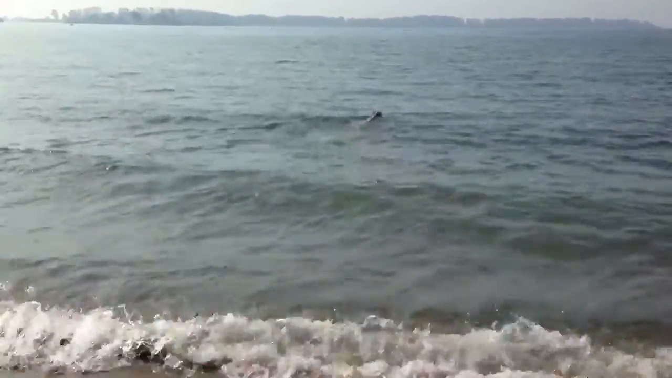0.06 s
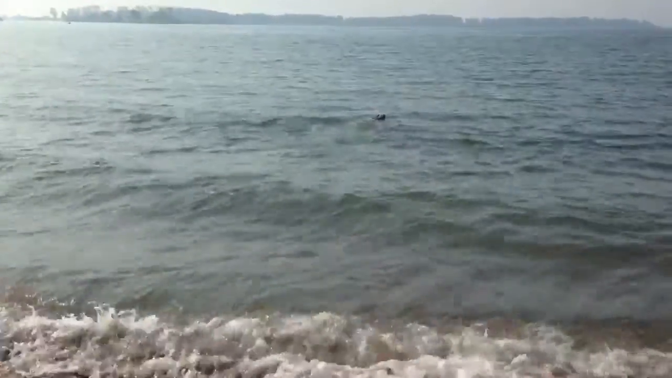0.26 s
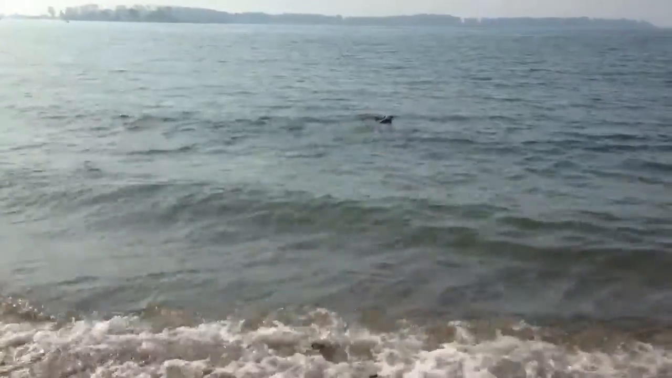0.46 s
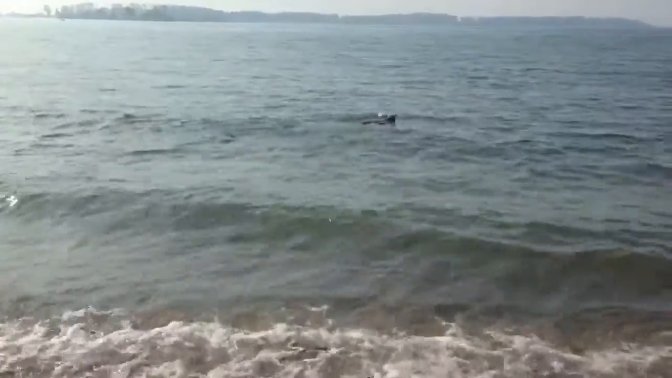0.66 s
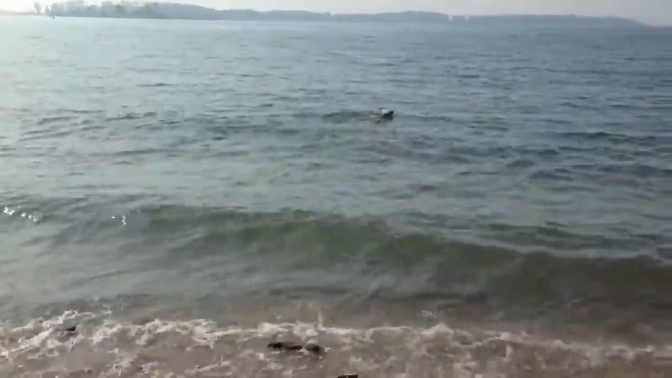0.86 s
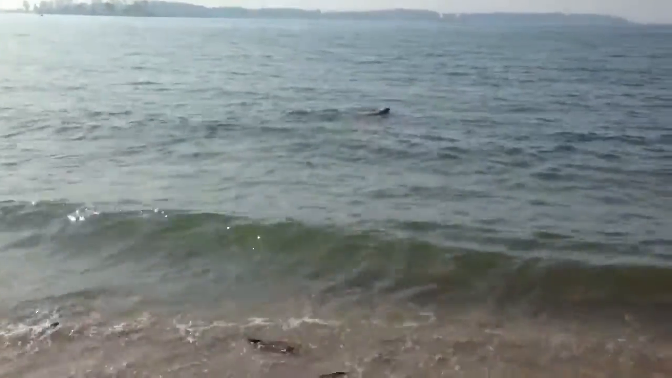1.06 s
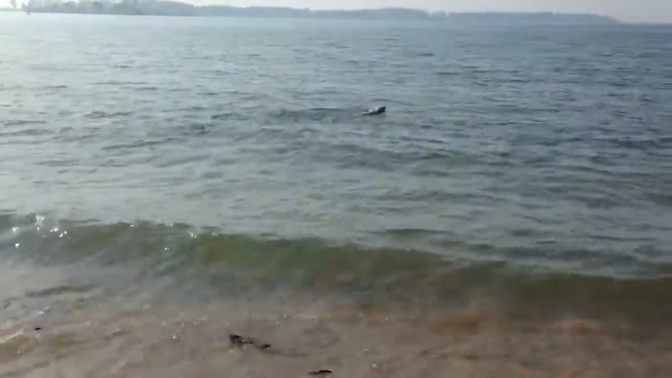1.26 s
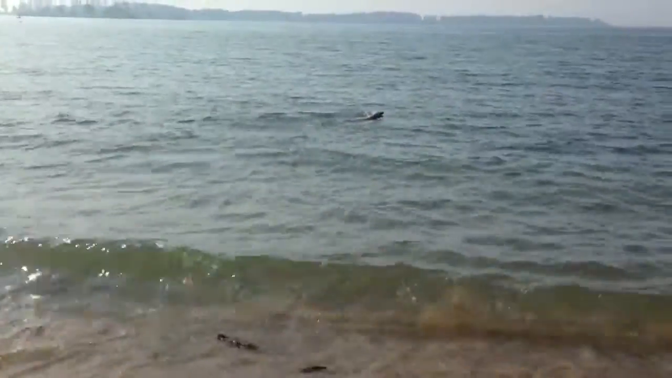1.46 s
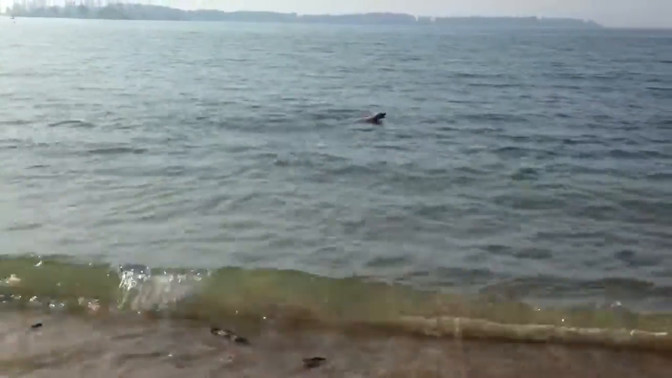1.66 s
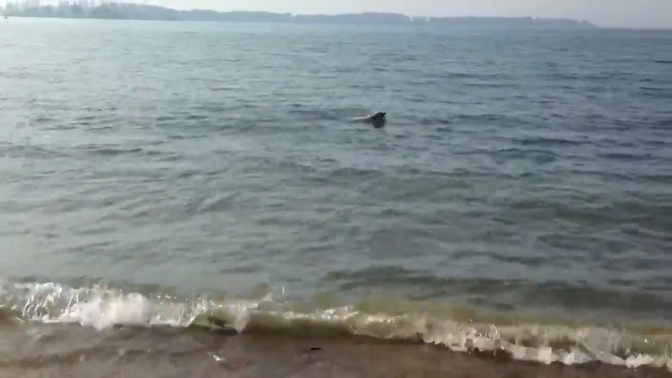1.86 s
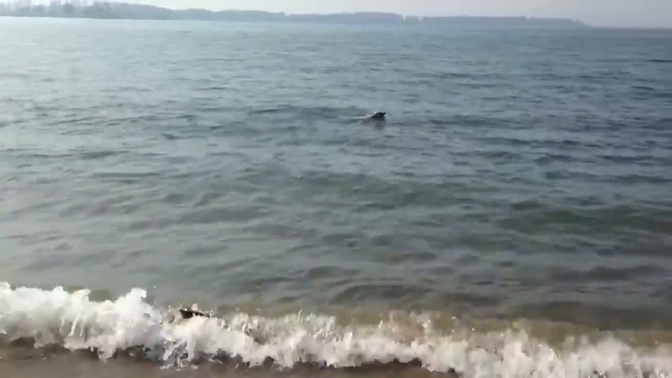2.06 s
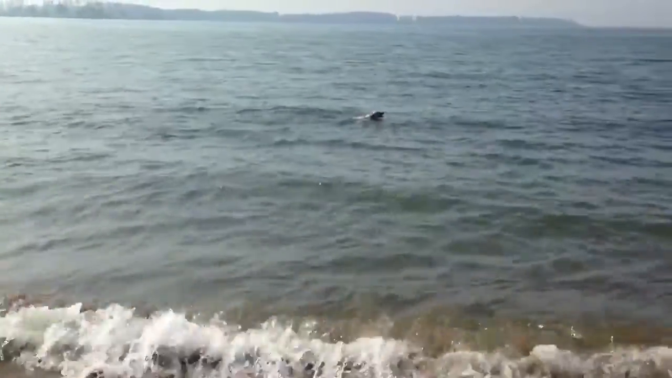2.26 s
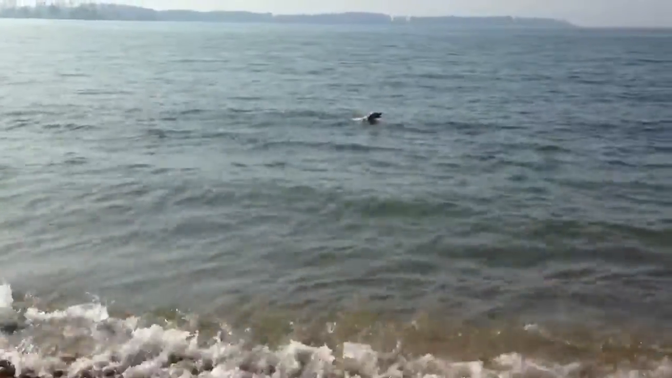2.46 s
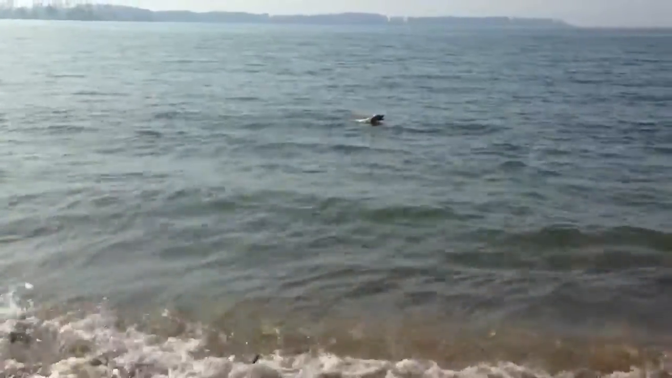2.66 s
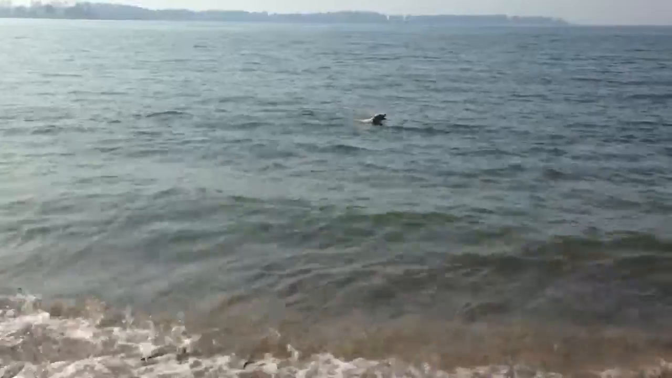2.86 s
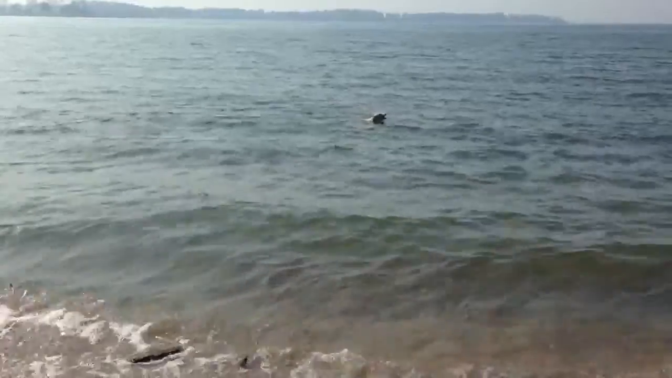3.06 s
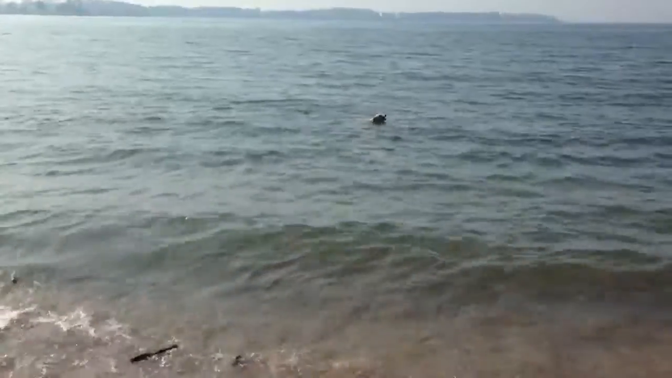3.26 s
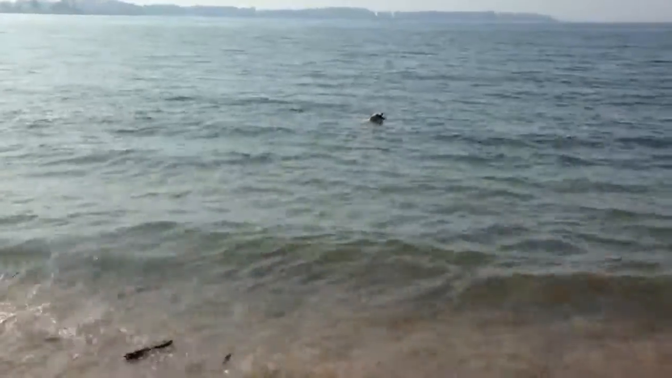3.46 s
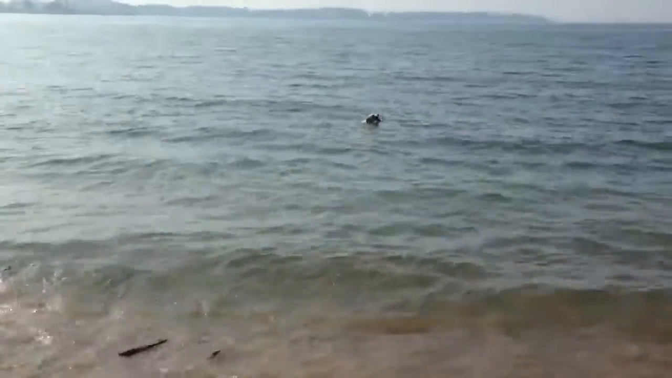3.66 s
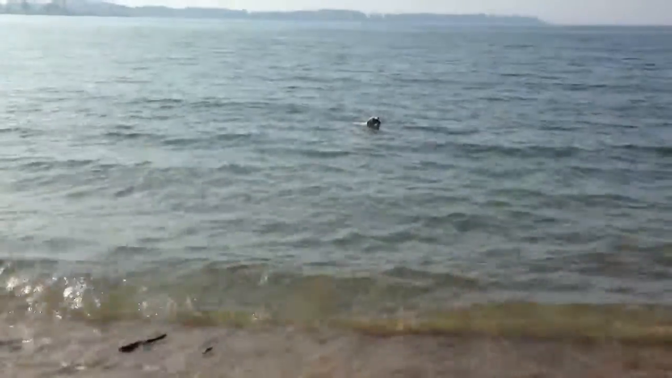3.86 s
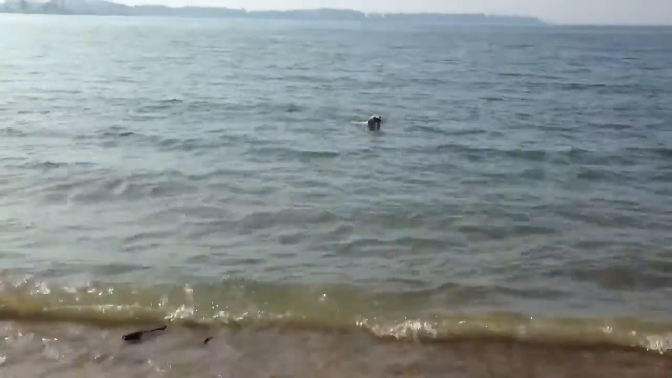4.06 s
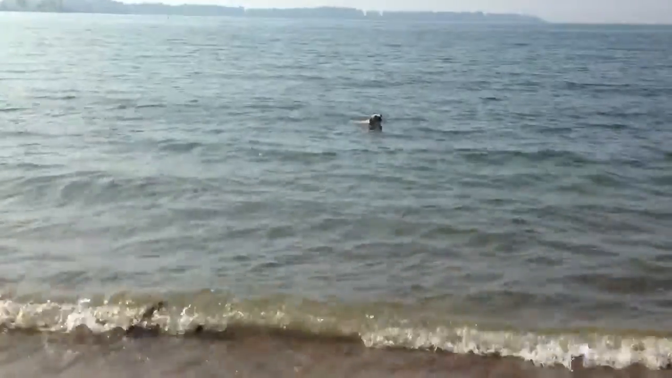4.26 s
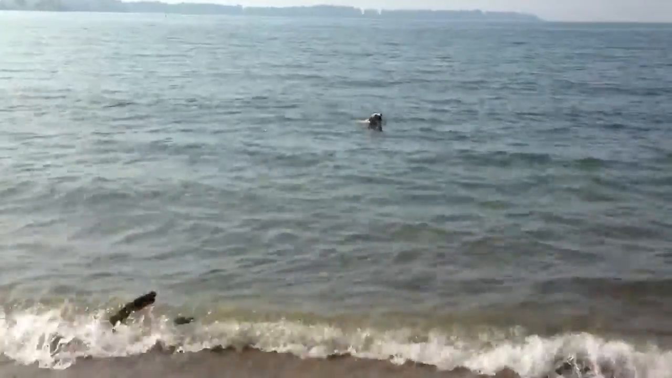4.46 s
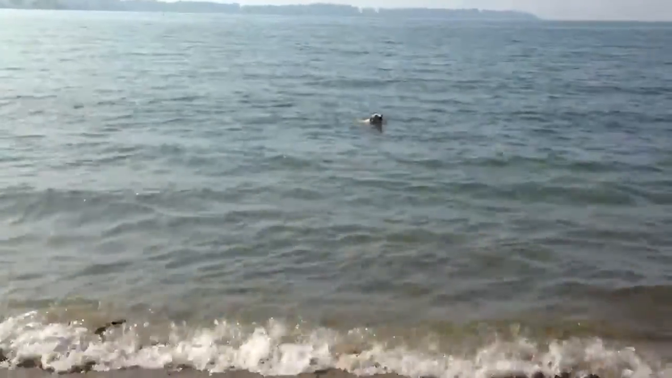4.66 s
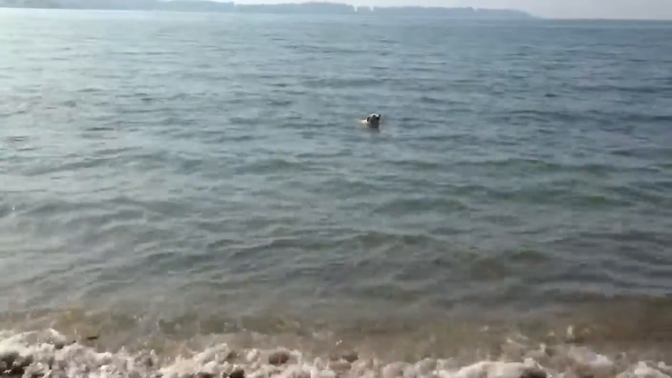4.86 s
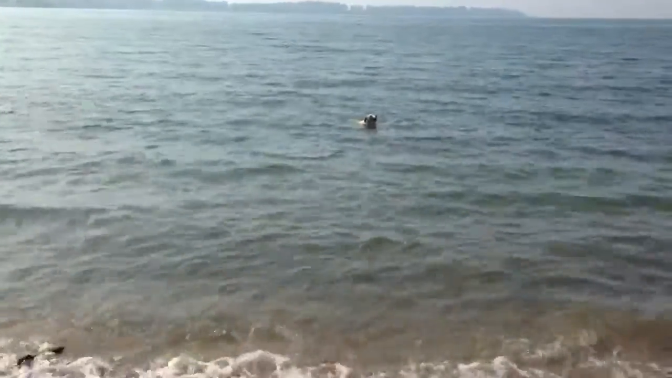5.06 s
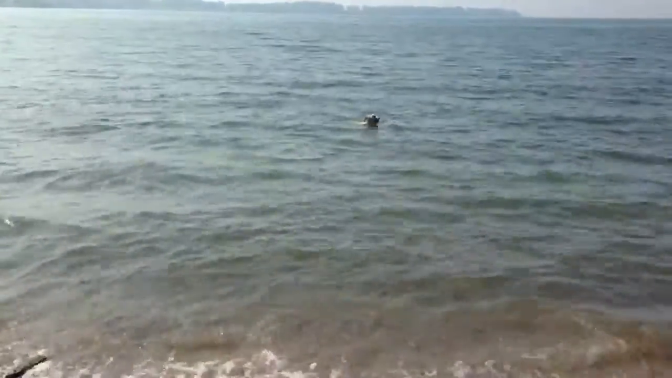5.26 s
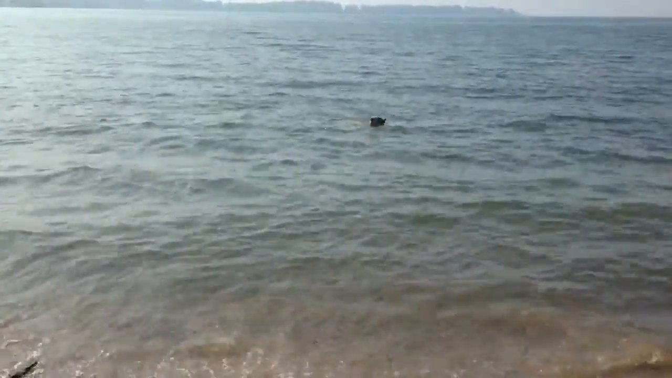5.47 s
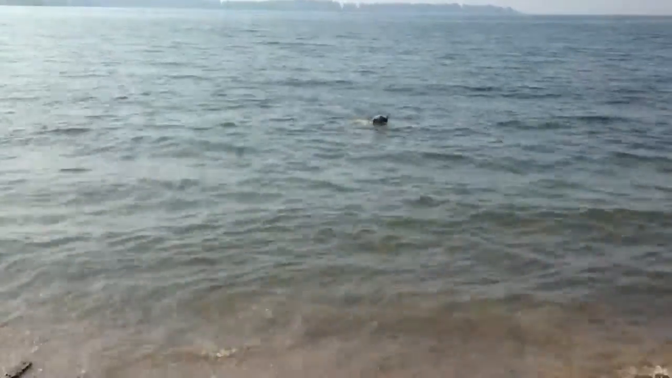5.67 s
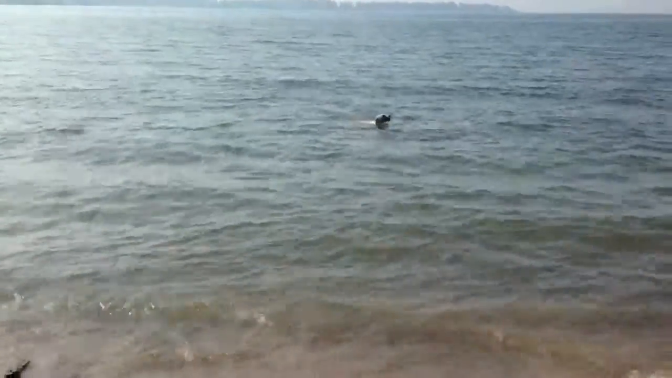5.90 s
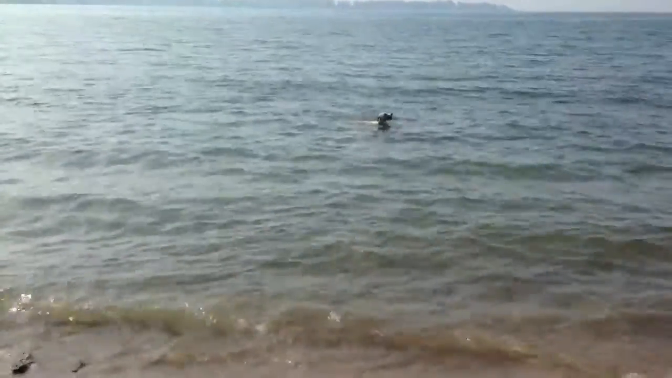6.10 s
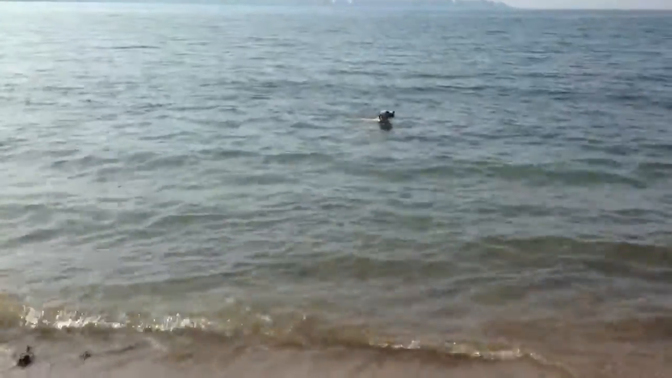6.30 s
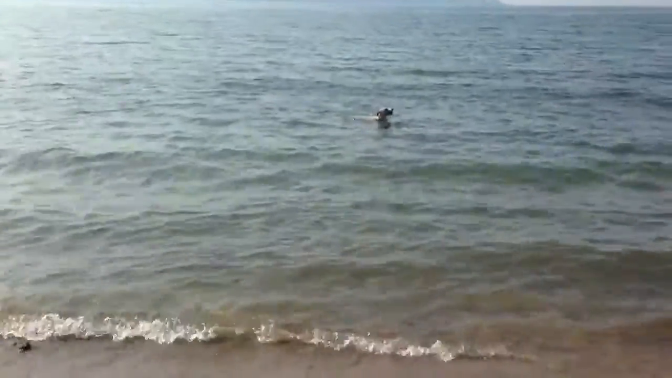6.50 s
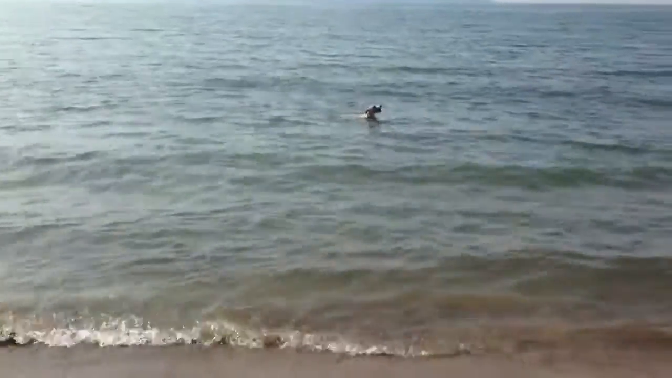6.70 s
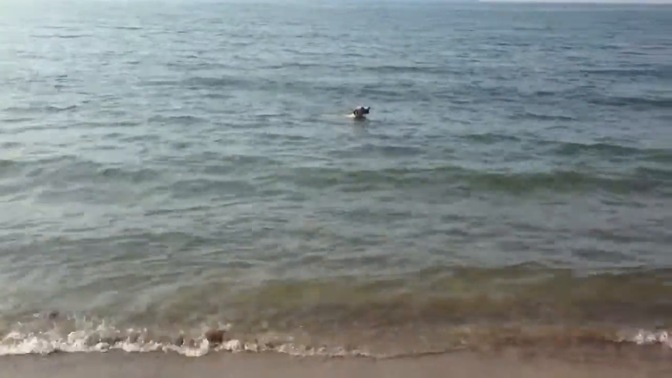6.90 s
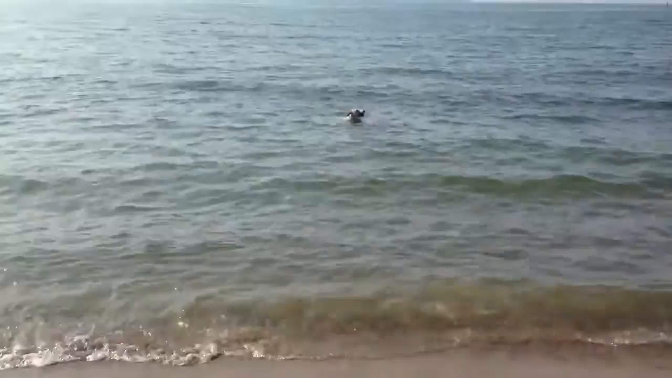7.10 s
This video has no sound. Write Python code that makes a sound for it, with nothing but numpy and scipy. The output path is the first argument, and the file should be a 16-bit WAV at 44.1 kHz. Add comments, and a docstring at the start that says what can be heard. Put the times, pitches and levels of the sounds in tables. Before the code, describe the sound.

Gentle surf close by: bright splashing crests, gurgling bubbles and trickling backwash, over low lumpy wind bumps and one faint bird whistle.

```python
"""Small waves on a sandy beach

Small waves break a few steps from a mono microphone: noise and ringing bubbles, coloured as each wave swells and drains.
Each crest spills as bright spray, slaps down in bursts of hollow noise and drains away as fizzing, trickling foam.
Wind is lumpy low noise with short swinging bumps; drops tick close by as tiny high rings.
Foam pops on the sand in high pings, and a far bird gives one faint whistle, a falling sine."""
import sys
import numpy as np
from scipy import signal
from scipy.fft import rfft, irfft
from scipy.io import wavfile
from scipy.ndimage import uniform_filter1d

SR = 44100
rng = np.random.default_rng(int(sys.argv[2]) if len(sys.argv) > 2 else 0)


def inscribe(sig):
    """Save sig as 16-bit PCM at rate SR to the path in sys.argv[1].

    A 1-D sig is mono; a 2-D sig holds one channel per row.
    Samples are clipped to [-1, 1] before scaling.
    """
    pcm = np.round(np.clip(np.atleast_2d(sig).T, -1, 1) * 32767)
    wavfile.write(sys.argv[1], SR, pcm.astype(np.int16))


N = 314874
TIME = np.arange(N) / SR
FRAME, HOP = 1024, 256  # spectral frame and step [samples]
EDGE_HZ = 15450  # top of the recorder's band

# the bird's falling whistle: (time [s], pitch [Hz], level [dB])
WHISTLE_GLIDE = [(3.765, 2760, -63), (3.80, 2690, -58), (3.835, 2620, -55), (3.88, 2500, -61)]

# steady push of the wind, before its overall lift: (time [s], level [dB])
WIND_PUSH = [(0.0, -54), (0.22, -48.5), (0.5, -53), (0.85, -53), (0.97, -44.5), (1.16, -54), (1.28, -47.5),
             (1.45, -57), (1.65, -55), (1.85, -49), (2.34, -48.5), (2.78, -49), (3.04, -53), (3.56, -57.5),
             (4.05, -58), (4.3, -51.5), (4.61, -53), (5.43, -56.5), (6.0, -52.5), (6.3, -52.5),
             (7.14, -56.5)]
# relative colour of the wind in the microphone port: (frequency [Hz], level [dB per Hz])
PORT_COLOUR = [(20, -36), (55, -30), (80, -11.5), (105, -6.5), (140, 5.5), (190, 2), (280, -4.5),
               (400, -24), (700, -47), (2000, -53)]
# strong eddies that bump the microphone:
# (start [s], swing level [dB], nominal ring [Hz], time to peak [s])
STRONG_EDDIES = [(0.171, -32.5, 210, 0.013), (0.366, -33, 174, 0.0046), (0.396, -31, 244, 0.0027),
                 (0.465, -42.5, 165, 0.0026), (0.595, -33, 187, .005), (0.670, -32, 224, 0.0065),
                 (0.889, -27.5, 159, 0.0036), (0.939, -28, 218, 0.0055), (0.959, -34.5, 200, 0.005),
                 (0.986, -35, 210, 0.0038), (1.013, -34.5, 221, 0.0044), (1.052, -31, 174, 0.0059),
                 (1.096, -36.5, 190, 0.0043), (1.256, -36, 214, 0.0062), (1.316, -36, 198, 0.0018),
                 (1.333, -39, 235, 0.0043), (1.369, -31.5, 246, 0.0055), (1.575, -36.5, 235, 0.0061),
                 (1.691, -37, 229, 0.0041), (1.865, -39, 247, .003), (1.909, -30, 260, 0.0054),
                 (1.925, -26, 213, 0.0029), (1.990, -24, 196, 0.0026), (2.199, -26, 232, 0.0035),
                 (2.222, -30, 228, .005), (2.359, -27.5, 288, 0.0053), (2.501, -27, 270, 0.0039),
                 (2.596, -32, 248, 0.0034), (2.624, -31.5, 166, 0.0056), (2.646, -32, 235, 0.0035),
                 (2.693, -24, 170, 0.0038), (2.750, -33, 194, 0.0034), (2.842, -35.5, 270, 0.0058),
                 (2.889, -23.5, 186, 0.0029), (2.925, -36, 187, 0.0031), (3.229, -25, 223, 0.0021),
                 (3.239, -23, 182, 0.0031), (3.470, -38.5, 160, 0.0049), (3.648, -29.5, 202, 0.0022),
                 (3.898, -36, 200, 0.0027), (3.978, -37, 216, 0.0024), (4.004, -39, 280, 0.0022),
                 (4.055, -40, 194, .003), (4.158, -34, 202, 0.0024), (4.185, -30.5, 190, 0.0015),
                 (4.247, -37, 231, .004), (4.305, -33, 210, 0.0031), (4.327, -25.5, 156, 0.0045),
                 (4.402, -26, 270, 0.0031), (4.707, -29, 208, 0.0075), (4.804, -26, 180, 0.0028),
                 (4.862, -34, 242, 0.0063), (4.968, -34, 177, 0.005), (5.062, -35, 223, 0.0024),
                 (5.164, -34.5, 232, 0.0038), (5.325, -31, 168, 0.0046), (5.411, -39, 178, 0.0058),
                 (5.851, -36.5, 182, 0.004), (5.970, -35, 178, 0.0085), (6.050, -29.5, 188, 0.0026),
                 (6.124, -37, 200, 0.0032), (6.168, -34, 251, 0.0059), (6.204, -24, 218, 0.0038),
                 (6.241, -32.5, 226, 0.003), (6.262, -39, 210, 0.0055), (6.353, -34.5, 247, 0.0026),
                 (6.369, -32.5, 162, .004), (6.493, -38, 254, 0.0087), (6.519, -26.5, 223, 0.0037),
                 (6.897, -32, 221, 0.0024), (7.024, -34, 220, .003)]
# weak eddies at random: how many a second, level above the wind push and scatter either way [dB]
EDDIES_PER_S, EDDY_DB, EDDY_SCATTER_DB = 5.1, 6.5, 7.5
EDDY_HZ, EDDY_S = 174, 0.0034  # middle ring and time to peak

# close drops: (start [s], ring level [dB], pitch [Hz], time to peak [s])
CLOSE_DROPS = [(0.169, -33, 11000, .0003), (0.509, -44, 6500, .0003), (0.573, -48, 6230, .0003),
               (0.613, -44, 10500, .0002), (1.2564, -26.5, 10400, 0.0001), (1.467, -48, 6500, .0006),
               (1.575, -41, 7800, 0.0008), (1.667, -34.5, 6940, 0.00024), (3.406, -47, 7150, 0.0009),
               (3.407, -49, 5470, .001), (3.686, -51, 5400, 0.00044), (5.011, -36, 6000, .0003),
               (5.133, -44, 8500, .0002), (5.283, -49, 8300, .0008), (6.348, -40, 6830, 0.0004),
               (6.403, -44, 7750, 0.00092)]
# foam bursting on the sand as the water draws back: (centre [s], level [dB], spread either side [s])
FOAM_BURSTS = [(1.05, -67, 0.22), (3.01, -55, .03), (3.5, -70, 0.28), (5.25, -57, 0.13),
               (5.722, -54, 0.029), (5.833, -54.5, .04), (5.999, -50.5, 0.025)]
# large single bubbles: (start [s], peak level [dB], starting pitch [Hz], time to peak [s])
LARGE_BUBBLES = [(0.652, -48.5, 867, 0.0068), (1.371, -38, 457, 0.0021), (1.706, -36, 346, 0.0025),
                 (1.7, -44, 1300, .003), (1.795, -34.5, 720, 0.003), (1.962, -30, 413, 0.0046),
                 (2.364, -27, 360, 0.0057), (2.467, -33, 2570, .0025), (2.569, -29, 830, 0.0032),
                 (2.809, -39, 900, 0.0036), (2.94, -40, 740, .003), (2.962, -43, 2070, 0.0033),
                 (3.032, -41, 602, .0035), (3.077, -40, 732, .003), (3.375, -49, 387, 0.0061),
                 (3.688, -47, 1640, .003), (3.699, -52, 2190, .003), (4.158, -44, 2070, .0025),
                 (4.328, -32, 510, 0.0032), (4.412, -34, 730, .0035), (4.42, -31, 656, .003),
                 (4.663, -28, 660, 0.0025), (4.725, -30, 647, 0.0024), (5.474, -47, 1205, .002),
                 (5.519, -40, 689, 0.0015), (5.65, -45, 1190, 0.0016), (5.822, -41, 3100, 0.0014),
                 (6.548, -39, 415, 0.0033), (6.566, -37, 710, 0.0022)]
# sheets of water that slap down: (start [s], level [dB], centre [Hz], time to peak [s])
WATER_SHEETS = [(0.018, -36, 624, 0.0038), (0.206, -34, 380, 0.0048), (0.513, -42, 750, .003),
                (2.01, -32, 400, 0.0026), (2.147, -33, 430, 0.0043), (2.172, -26.5, 680, 0.0036),
                (2.20, -31, 302, .003), (2.241, -33, 340, 0.011), (2.437, -30, 430, 0.0028),
                (2.468, -35, 550, 0.0027), (2.884, -42, 400, .004), (3.238, -41, 450, .004),
                (4.398, -31.5, 430, 0.0023), (4.572, -37, 300, 0.005), (4.676, -36, 330, 0.0034),
                (4.721, -34, 520, 0.0035), (6.796, -41, 340, 0.012), (6.851, -40, 330, 0.0054),
                (6.893, -34, 516, 0.0034), (6.925, -42, 320, 0.015)]

# trickle of the backwash: bubble level [dB], its share of the foam's swell [dB per dB],
# and the high pops against the bubbles [dB]
TRICKLE_DB, TRICKLE_FOLLOW, POPS_DB = -57.5, .65, -11

# bands that carry churn, foam and spray: (low edge [Hz], high edge [Hz])
PART_BANDS = [(450, 1000), (1400, 4500), (6500, 15000)]
# relative colour of a breaking wave: (frequency [Hz], level [dB per Hz])
BREAKER_COLOUR = [(41, -58), (70, -57), (98, -60), (129, -11), (207, -0.5), (347, -2), (435, -1),
                  (850, -0.76), (1060, -4.5), (1300, -3), (1580, -4), (1950, -4.5), (2650, -7), (3150, -9),
                  (3960, -9), (5400, -12), (12800, -24.5), (15300, -28)]
# relative colour of the thin wash between waves: (frequency [Hz], level [dB per Hz])
BACKWASH_COLOUR = [(60, -34), (150, -4), (300, 4.5), (500, -2.5), (800, -5.5), (1100, -6), (1420, -5.5),
                   (1580, -7.5), (1800, -4), (2300, -8.5), (2650, -5.5), (3230, -11.5), (3600, -8),
                   (4200, -9), (5100, -10.5), (5800, -11.5), (7000, -12), (10000, -15), (15300, -18.5)]
# breaking waves: (fully broken, before each part's lag [s], rise [s], hold [s], foam [dB],
# churn above the foam [dB], spray above the foam [dB], extra draining tail [dB])
BREAKING_WAVES = [(-0.1, .4, 0.29, -36.5, -3, -6.5, -2), (2.015, 0.44, 0.11, -32, -4.5, -7.5, 1),
                  (2.463, 0.97, 0.005, -37.5, -.5, -6, -2), (4.441, 0.63, 0.24, -35.5, -2, -8.5, 3),
                  (6.535, 0.33, 0.35, -43, -4, -10, 3), (6.915, 0.78, 0.064, -44.5, -20, -17, 6)]
# stretches of a crest, or small ripples, that tip over at once:
# (centre [s], foam [dB], churn [dB], spread either side [s])
CREST_PLUNGES = [(0.003, -37, -34, 0.023), (0.226, -37, -38, 0.029), (1.685, -48.5, -81, 0.034),
                 (1.985, -35, -39.5, 0.05), (2.096, -30, -34.5, .021), (2.159, -38, -31.5, 0.027),
                 (2.253, -50, -34.5, 0.026), (2.325, -40, -38, 0.023), (2.423, -44, -36.5, 0.018),
                 (2.476, -34.5, -34.5, .026), (2.822, -46.5, -51, 0.033), (3.072, -59.5, -51, 0.014),
                 (3.2, -55, -54, 0.043), (3.55, -54, -63, 0.031), (3.70, -57, -58, .018),
                 (4.164, -45, -52, 0.025), (4.225, -50, -47, 0.018), (4.318, -42, -57, 0.015),
                 (4.43, -36, -38, 0.029), (4.49, -40, -44, 0.023), (4.555, -35.5, -39, 0.04),
                 (4.62, -43, -39, .015), (4.67, -40, -35, 0.017), (4.805, -43, -42, 0.034),
                 (6.417, -50, -59, .025), (6.553, -48, -42, 0.022), (6.623, -41, -48, 0.022),
                 (6.818, -47, -49, 0.022), (6.91, -53, -42.5, 0.051), (7.01, -43, -47, 0.015)]
PLUNGE_SPRAY_DB = -10  # a plunge's spray against its foam
SWELL_POWER = 2.1  # a wave's amplitude grows as this power of the time since it began to spill
# how churn, foam and spray, one row each, follow a wave:
# (lag [s], collapse [dB per s], draining tail [dB], drain [dB per s], offset from the lapping [dB])
WAVE_PARTS = [(0.045, 35.5, -11.5, 11, -3), (-0.026, 28, -12.5, 12.5, -0.5), (-0.045, 37, -6, 21, -9)]
# ripples lapping between the waves: (time [s], level [dB])
LAPPING_LEVEL = [(0, -61), (1.0, -53), (1.5, -56), (3.0, -54), (3.6, -55.5), (3.92, -55.5), (5.4, -54),
                 (5.85, -49.5), (6.2, -54), (6.36, -52), (6.42, -49), (7.14, -41.5)]


def amp(db):
    """Decibels to gain."""
    return 10 ** (np.asarray(db) / 20)


def unit(x):
    """Scales to rms 1."""
    return x / np.sqrt(np.mean(x ** 2) + 1e-20)


def read(points, hz):
    """Reads a spectrum in dB, joined on a log-frequency axis."""
    f, db = np.transpose(points)
    return np.interp(np.log(hz + 1), np.log(f + 1), db)


def add(mix, s, sound):
    """Mixes a sound in at time s."""
    part = mix[max(round(s * SR), 0):][:len(sound)]
    part += sound[:len(part)]


def surge(t, length):
    """A quick swell to 1 at t = length, then a smooth die-away."""
    age = t / length
    return age * np.exp(1 - age)


def drift(rate_hz):
    """Random wander of rms 1, mostly slower than the given rate."""
    hz = np.fft.rfftfreq(N, 1 / SR)
    return unit(irfft(rfft(rng.standard_normal(N)) / (1 + (hz / rate_hz) ** 4), N))


def bubbles(per_s, low_hz, high_hz, cycles, spread_db, rise, count):
    """Bubbles of many sizes ring briefly, rising in pitch as they near the surface; small ones are more numerous."""
    out = np.zeros(N)
    sizes = np.geomspace(low_hz, high_hz, count)
    for hz, share in zip(sizes, sizes / sizes.sum()):
        age = np.arange(int(5 * cycles / hz * SR) + 2) * hz / SR  # in cycles
        ring = np.sin(2 * np.pi * age * (1 + rise * age / cycles)) * np.exp(-age / cycles)
        strength = amp(spread_db * np.minimum(rng.exponential(1, N), 4))
        births = (rng.random(N) < per_s * share / SR) * strength
        out += np.sqrt(hz) * signal.oaconvolve(births, ring)[:N]
    return unit(out)


def bird():
    """One thin falling whistle: a sine whose pitch wavers slightly."""
    s, hz, db = np.transpose(WHISTLE_GLIDE)
    pitch = np.interp(TIME, s, hz) * (1 + 0.009 * drift(90))
    turns = np.cumsum(pitch) / SR
    return np.interp(TIME, s, amp(db), left=0, right=0) * np.sin(2 * np.pi * turns)


def wind(lift_db=2.5, lumpy_db=3.0):
    """Lumpy turbulence at the port, its deep bass cut away by the microphone."""
    push = rng.standard_normal(N) * amp(lumpy_db * drift(20))
    colour = amp(read(PORT_COLOUR, np.fft.rfftfreq(N, 1 / SR)))
    rumble = unit(irfft(rfft(push) * colour, N))
    return rumble * amp(lift_db + np.interp(TIME, *np.transpose(WIND_PUSH)))


def weak_eddies():
    """Rows like those of the strong eddies, at chance moments, their strength following the wind."""
    chance = rng.random((int(EDDIES_PER_S * N / SR), 3))
    s = chance[:, 0] * N / SR
    scatter = EDDY_SCATTER_DB * (2 * chance[:, 1] - 1)
    db = np.interp(s, *np.transpose(WIND_PUSH)) + EDDY_DB + scatter
    hz = EDDY_HZ * 2 ** (chance[:, 2] - .5)  # within half an octave
    return list(zip(s, db, hz, np.full(len(s), EDDY_S)))


def bumps(sag=0.079, ragged=0.26, cut_hz=105, puff=0.06, puff_hz=480, skew=0.087):
    """Each eddy swings the port briefly with a dull puff, its pitch sagging raggedly as it passes."""
    out, t = np.zeros(N), TIME[:SR // 10]
    puff_filter = signal.butter(2, puff_hz, fs=SR, output="sos")
    for s, db, hz, length in STRONG_EDDIES + weak_eddies():
        wobble = unit(uniform_filter1d(rng.standard_normal(len(t)), size=70))
        slowing = sag * (2 * np.exp(-t / length / 2) - 1)
        turns = np.cumsum(hz * (1 + slowing + ragged * wobble)) / SR
        air = unit(signal.sosfilt(puff_filter, rng.standard_normal(len(t))))
        push = surge(t, length)
        lopsided = skew * push * np.sin(4 * np.pi * turns)  # the swing is uneven at its height
        add(out, s, amp(db) * push * (np.sin(2 * np.pi * turns) + lopsided + puff * air))
    # the microphone passes no deep bass
    return signal.sosfiltfilt(signal.butter(3, cut_hz, "highpass", fs=SR, output="sos"), out)


def drops(splash=0.59, echo=0.24, echo_s=0.00035):
    """A drop lands with a tiny noisy splash and a short high ring, then one almost immediate echo."""
    out, t = np.zeros(N), TIME[:SR // 40]
    for s, db, hz, length in CLOSE_DROPS:
        ring = np.sin(2 * np.pi * hz * t)
        tick = amp(db) * surge(t, length) * (ring + splash * rng.standard_normal(len(t)))
        add(out, s, tick)
        add(out, s + echo_s, echo * tick)
    return out


def sizzle():
    """Beads of foam burst on the bare sand, each a tiny high ping."""
    level = sum(amp(db) * np.exp(-((TIME - s) / spread) ** 2) for s, db, spread in FOAM_BURSTS)
    return level * bubbles(per_s=420, low_hz=3300, high_hz=5300, cycles=9, spread_db=0, rise=0.0073, count=24)


def trickle():
    """Water draining over the sand: sparse bubbles and tiny pops that swell less than the foam does."""
    foam_db = np.interp(TIME, TIME[::HOP], wave_levels(TIME[::HOP])[1])
    plinks = bubbles(per_s=110, low_hz=620, high_hz=4800, cycles=8, spread_db=3.2, rise=0.02, count=44)
    pops = bubbles(per_s=160, low_hz=4500, high_hz=9000, cycles=6, spread_db=2.6, rise=0.01, count=12)
    level_db = TRICKLE_DB + TRICKLE_FOLLOW * (foam_db - np.median(foam_db))
    return amp(level_db) * (plinks + amp(POPS_DB) * pops)


def glugs(rise=0.014):
    """A pocket of trapped air rings, its pitch creeping up."""
    out, t = np.zeros(N), TIME[:SR // 10]
    for s, db, hz, length in LARGE_BUBBLES:
        ring = np.sin(2 * np.pi * hz * t * (1 + rise * t / length))
        add(out, s, amp(db) * surge(t, length) * ring)
    return out


def slops(width=0.3):
    """A sheet of water lands: a brief hollow splash around the pitch of the air it traps."""
    out, t = np.zeros(N), TIME[:SR // 10]
    f = np.fft.rfftfreq(len(t), 1 / SR)
    for s, db, hz, length in WATER_SHEETS:
        band = np.exp(-(np.log((f + 1) / hz) / width) ** 2 / 2)
        hollow = irfft(rfft(rng.standard_normal(len(t))) * band, len(t))
        push = surge(t, length)
        # the splash gets the rms of its swell, whatever the noise draw
        add(out, s, amp(db) * np.sqrt(np.mean(push ** 2)) * unit(push * hollow))
    return out


def wave_levels(t):
    """dB of churn, foam and spray: each wave swells, holds, collapses and drains away over the lapping of the sea."""
    lapping, levels = np.interp(t, *np.transpose(LAPPING_LEVEL)), []
    for k, (lag, collapse, tail_db, drain, lapping_db) in enumerate(WAVE_PARTS):
        power = amp(lapping + lapping_db) ** 2
        for s, rise, hold, foam_db, churn_db, spray_db, extra_db in BREAKING_WAVES:
            age = t - s - lag
            swell = np.clip(1 + age / rise, 0, 1) ** SWELL_POWER
            spent = np.maximum(age - hold, 0)
            fall = amp(-collapse * spent) ** 2 + amp(tail_db + extra_db - drain * spent) ** 2
            part_db = foam_db + (churn_db, 0, spray_db)[k]
            power = power + (amp(part_db) * swell) ** 2 * fall
        for s, foam_db, churn_db, spread in CREST_PLUNGES:
            part_db = (churn_db, foam_db, foam_db + PLUNGE_SPRAY_DB)[k]
            power = power + amp(part_db) ** 2 * np.exp(-((t - s) / spread) ** 2)
        levels.append(10 * np.log10(power))
    return np.array(levels)


def surf_colour(t, hz, calm_db=-55, span_db=12, boom_db=4, boom_hz=365, deep_db=-41, boom_lag_s=0.12,
                ripple_db=0.2):
    """dB over frequency and time: wash turns to breaker as foam grows; churn, foam and spray weight bass to treble."""
    # foam and spray ripple together, very slightly
    levels = wave_levels(t) + np.outer([0, ripple_db, ripple_db], np.interp(t, TIME, drift(4.1)))
    breaking = np.clip((levels[1] - calm_db) / span_db, 0, 1)
    field = np.outer(read(BREAKER_COLOUR, hz), breaking) + np.outer(read(BACKWASH_COLOUR, hz), 1 - breaking)
    # a heavy crest traps larger pockets of air, which boom lower a moment later
    heavy = np.clip((np.interp(t - boom_lag_s, t, levels[0]) - deep_db) / 7, 0, 1)
    boom = np.exp(-(np.log((hz + 1) / boom_hz) / 0.42) ** 2)
    field = field + boom_db * np.outer(boom, heavy - .4)
    # each part of the wave takes its level in its own band, blending into its neighbours
    held = []
    for lo, hi in PART_BANDS:
        band_power = (amp(field[(hz > lo) & (hz < hi)]) ** 2).sum(0)
        held.append(10 * np.log10(band_power / len(hz)))
    centres = np.log(PART_BANDS).mean(1)
    reach = np.transpose([np.interp(np.log(hz + 1), centres, row) for row in np.eye(len(centres))])
    return field + reach @ (levels - held)


def surf(wash_db=-2, gurgle_db=-19, churn_db=-23, fizz_db=-8, plops_db=-18, patchy_db=0.87, slosh_db=.5):
    """A wash of countless far bubbles, made of noise, with nearer ones standing out, all swelling with each wave."""
    churn = bubbles(per_s=160, low_hz=220, high_hz=980, cycles=1.5, spread_db=2.7, rise=0.02, count=16)
    gurgle = bubbles(per_s=600, low_hz=460, high_hz=4024, cycles=12, spread_db=3, rise=0.0089, count=70)
    fizz = bubbles(per_s=5000, low_hz=2532, high_hz=14340, cycles=4.1, spread_db=1, rise=0.018, count=22)
    plops = bubbles(per_s=200, low_hz=900, high_hz=3800, cycles=9, spread_db=2.1, rise=0.015, count=36)
    water = amp(wash_db) * rng.standard_normal(N) + amp(plops_db) * plops
    water += amp(churn_db) * churn + amp(gurgle_db) * gurgle + amp(fizz_db) * fizz
    water *= amp(slosh_db * drift(28))
    hz, t, z = signal.stft(water, SR, nperseg=FRAME, noverlap=FRAME - HOP)
    # clumps of like-sized bubbles burst together: patches in pitch, then in time
    patches = uniform_filter1d(rng.standard_normal(z.shape), size=10, axis=0)
    patches = unit(uniform_filter1d(patches, size=12, axis=1))
    z = z * amp(surf_colour(t, hz) + patchy_db * patches)
    return signal.istft(z, SR, nperseg=FRAME, noverlap=FRAME - HOP)[1][:N]


def scene():
    """Everything reaches one microphone, heard alike in both ears."""
    air = bird() + wind() + bumps()
    details = drops() + sizzle() + trickle() + glugs()
    shore = air + details + slops() + surf()
    return np.array([shore, shore])


def record(dry):
    """The recorder's steep band limit."""
    lowpass = signal.firwin(801, EDGE_HZ, window=("kaiser", 9), fs=SR)
    return signal.oaconvolve(dry, lowpass[None], "same")


dry = scene()
out = record(dry)
inscribe(out)
```